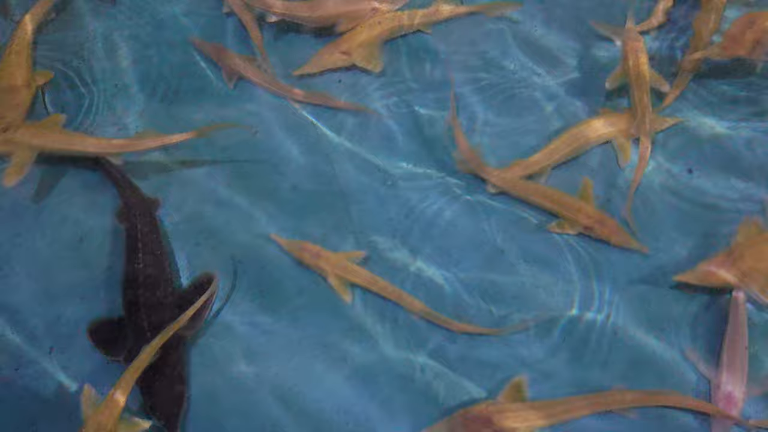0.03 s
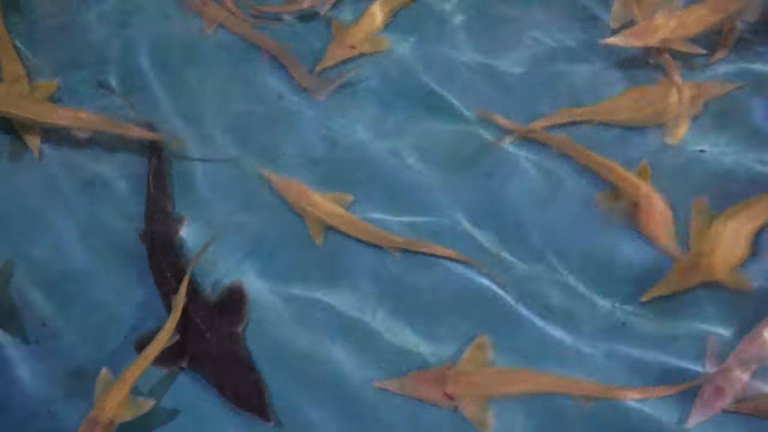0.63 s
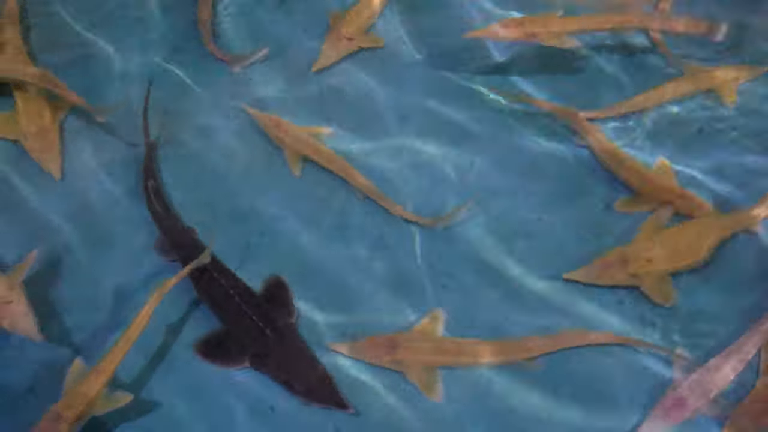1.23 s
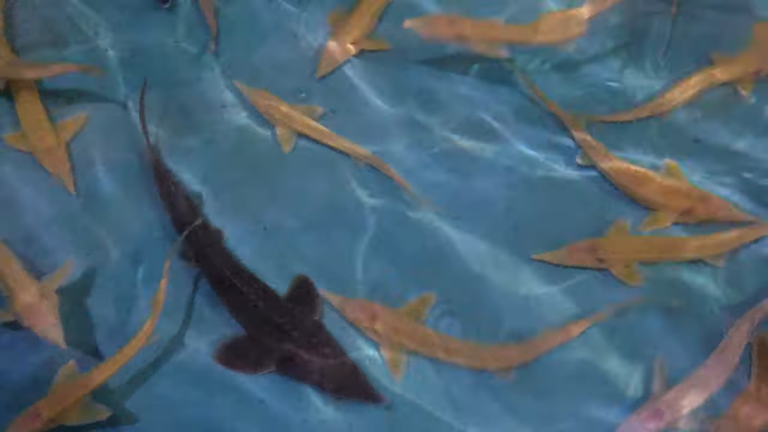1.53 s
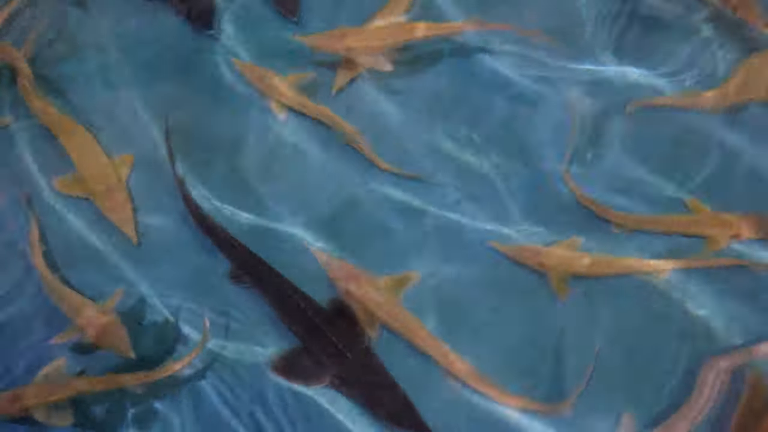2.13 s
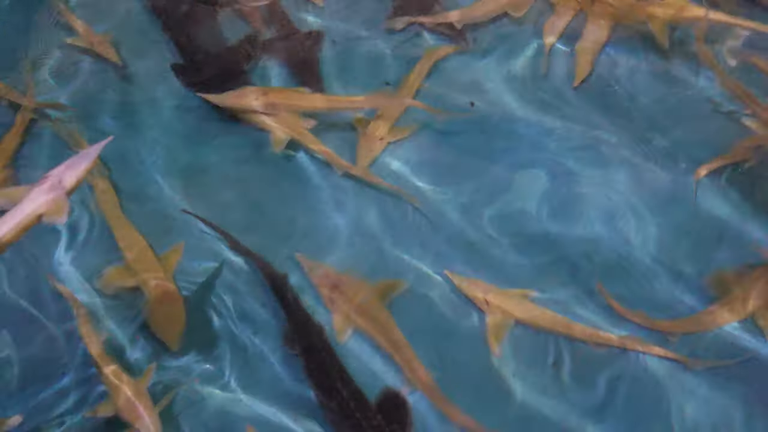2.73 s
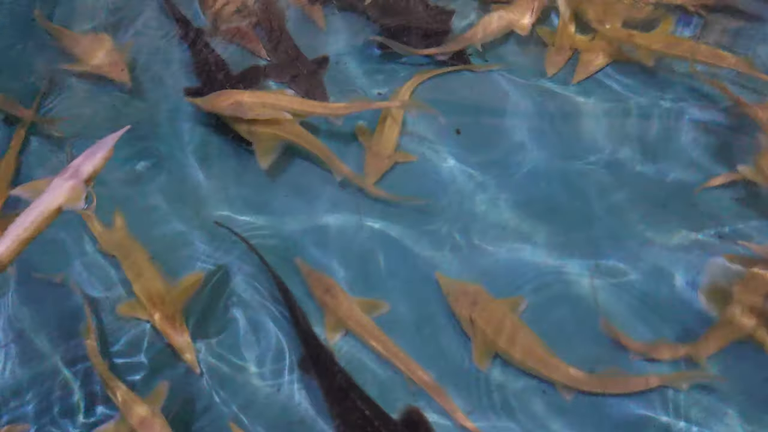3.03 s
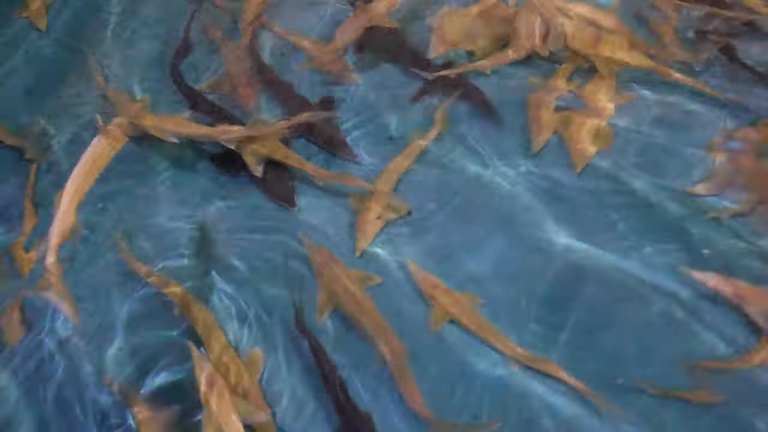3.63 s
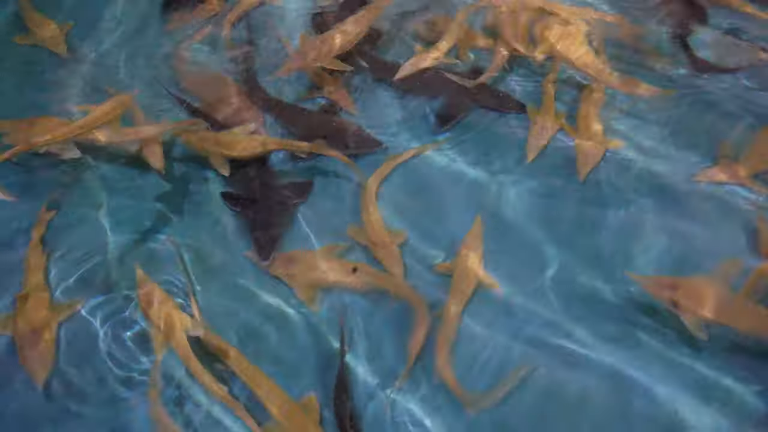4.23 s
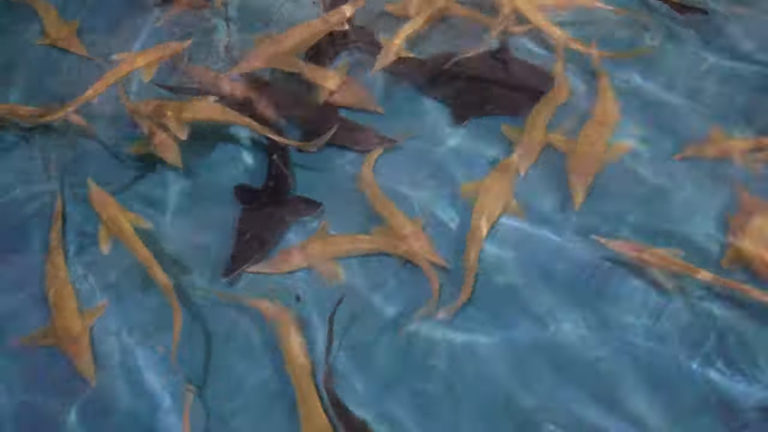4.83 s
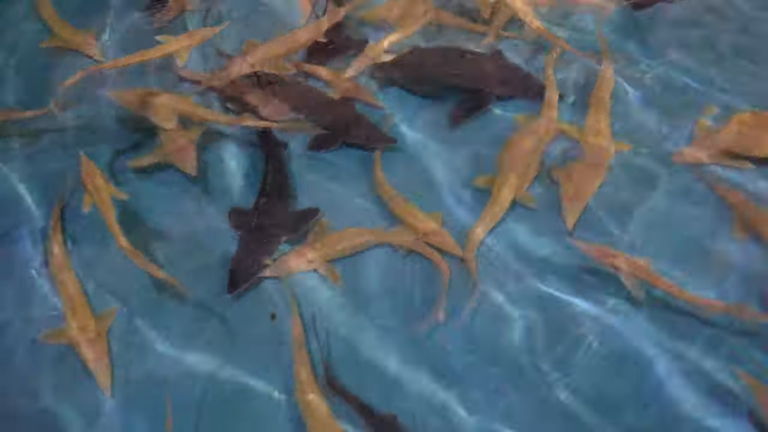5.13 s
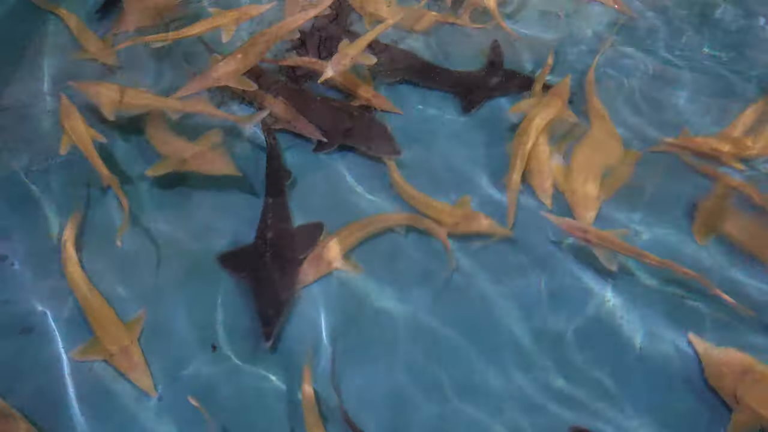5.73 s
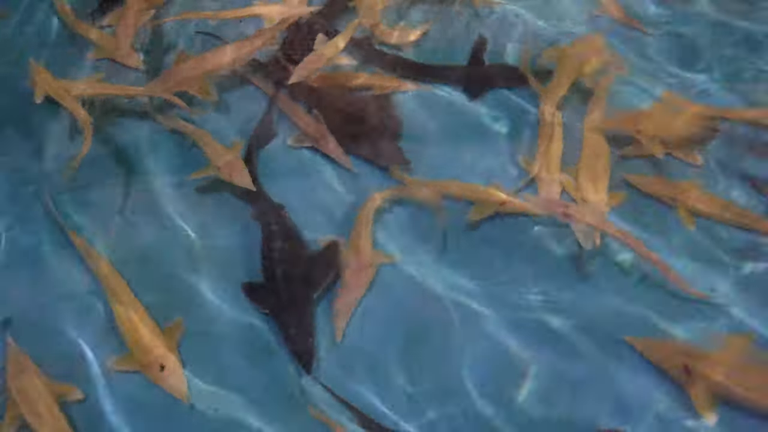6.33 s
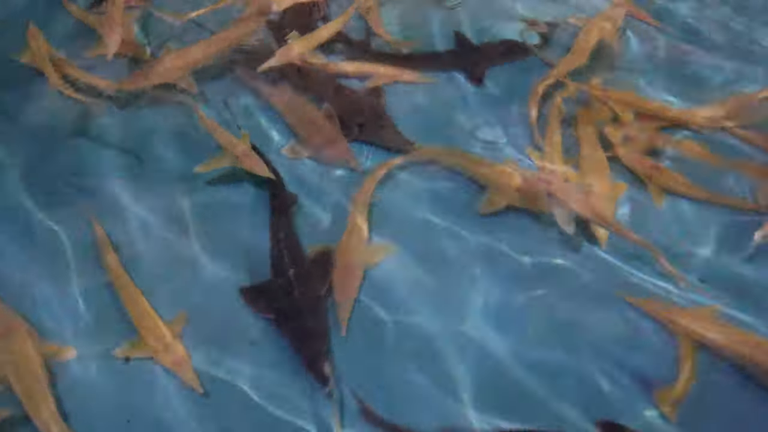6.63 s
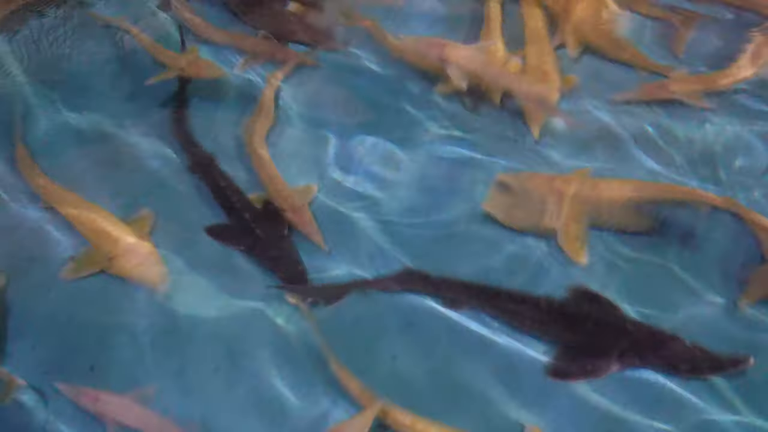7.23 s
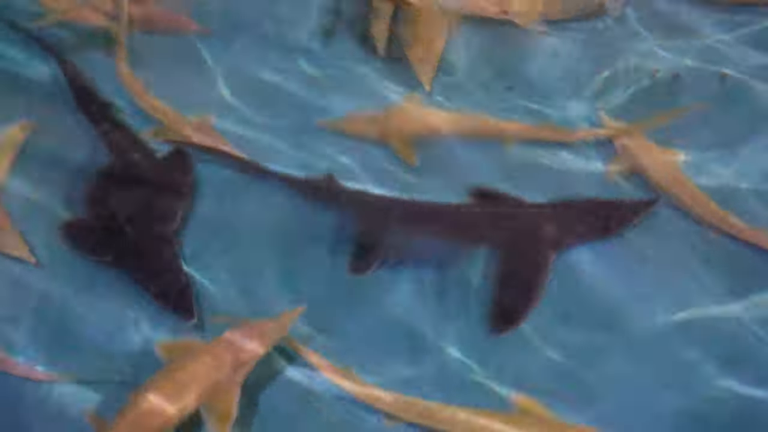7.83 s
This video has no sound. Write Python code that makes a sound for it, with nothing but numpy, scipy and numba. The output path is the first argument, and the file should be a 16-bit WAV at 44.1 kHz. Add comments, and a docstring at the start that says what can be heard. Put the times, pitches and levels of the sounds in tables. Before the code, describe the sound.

Water pours steadily into a fish tank, gurgling and splashing close by, with a low pump hum behind it.

```python
"""Water pours steadily into a fish tank under a roof, close to a hand-held stereo microphone.
The jet wavers and gushes, driving under swarms of ringing bubbles: deep gurgle, bright churn, fine spray.
Air pockets glug, lumps of water plip and torn sheets sizzle on top, a little to the right.
A pump hums behind; the tank resonates and the hall answers. A soft pop opens a fade-in of about a second."""
import sys
import numpy as np
from scipy import signal
from scipy.fft import rfft, irfft, next_fast_len
from scipy.io import wavfile
from scipy.ndimage import uniform_filter1d, map_coordinates
from numba import njit

SR = 44100
rng = np.random.default_rng(int(sys.argv[2]) if len(sys.argv) > 2 else 0)


def wav_record(signal):
    """Record a signal, one row per channel, as 16-bit PCM in the file named by sys.argv[1]."""
    frames = np.transpose(np.atleast_2d(signal))
    bounded = np.clip(frames, -1, 1)
    # unit amplitude maps onto the largest positive 16-bit level
    quanta = np.round(bounded * 32767).astype(np.int16)
    wavfile.write(sys.argv[1], SR, quanta)


N = 351477


def amp(db):
    """Decibels to gain."""
    return 10 ** (np.asarray(db) / 20)


def unit(x):
    """Scaled to rms 1."""
    return x / np.sqrt(np.mean(x ** 2) + 1e-20)


def along(points, hz):
    """(Hz, value) points read on a log axis."""
    f, values = np.transpose(points)
    return np.interp(np.log(hz + 1), np.log(f + 1), values)


def curve(points):
    """(Seconds, value) points read at every sample."""
    return np.interp(np.arange(N) / SR, *np.transpose(points))


def wobble(rate):
    """A smooth random curve, rate knots a second."""
    knots = rng.standard_normal(int(N * rate / SR) + 4)
    return map_coordinates(knots, [np.arange(N) * rate / SR])


def filtered(x, response):
    """x times a complex response of frequency."""
    m = next_fast_len(N + SR // 2)
    return irfft(rfft(x, m) * response(np.fft.rfftfreq(m, 1 / SR)), m)[..., :N]


def resonance(f, hz, width):
    """Response of one mode, 1 at its centre."""
    return 1j * f * width / (hz * hz - f * f + 1j * f * width)


def noise(spectrum, channels):
    """Unrelated noises of rms 1 with the given colour."""
    return unit(filtered(rng.standard_normal((channels, N)), lambda f: amp(along(spectrum, f))))


def bursts(starts, sizes, decay_s):
    """An envelope that jumps at each start and dies away; overlaps add in power."""
    kicks = np.bincount(np.clip(starts * SR, 0, N - 1).astype(int), sizes ** 2, N)
    return np.sqrt(signal.lfilter([1], [1, -np.exp(-2 / (decay_s * SR))], kicks))


def scattered(db, hz, spread_db, octaves, count):
    """Rows (s, dB, Hz) of small events strewn through the pour around a typical level and pitch."""
    when, level, pitch = rng.uniform(-1, 1, (count, 3)).T
    starts = (np.arange(count) + 1 + when) / (count + 1) * N / SR
    return np.column_stack([starts, db + spread_db * level, hz * 2 ** (octaves * pitch)])


@njit
def ring(starts, pitches, sizes, cycles, glide, n, sr):
    """Each bubble swells within a cycle, glides up in pitch and decays by 1/e over its cycles."""
    out = np.zeros(n)
    for i in range(len(starts)):
        first = max(int(starts[i] * sr), 0)
        for k in range(min(int(5 * cycles[i] * sr / pitches[i]), n - first)):
            turns = k * pitches[i] / sr
            age = turns / cycles[i]
            envelope = sizes[i] * (1 - np.exp(-1.5 * turns)) * np.exp(-age)
            out[first + k] += envelope * np.sin(2 * np.pi * turns * (1 + glide * age))
    return out


def bubbles(starts, pitches, sizes, cycles, glide):
    """Ringing bubbles from columns of time, pitch, size and life."""
    lives = cycles * np.ones(len(starts))
    return ring(starts.copy(), pitches.copy(), sizes.copy(), lives, float(glide), N, SR)


def swarm(spectrum, low_hz, high_hz, count, cycles, scatter_db):
    """Countless bubbles of random pitch, a few much louder than the rest; rms 1."""
    when, pitch, chance, life = rng.random((count, 4)).T
    hz = low_hz * (high_hz / low_hz) ** pitch
    size = amp(-scatter_db * np.log(chance + 0.0042) + along(spectrum, hz)) * hz
    return unit(bubbles(when * N / SR, hz, size, cycles * (.5 + life), glide=0.018))


# The roofed hall around the tank. Each row: frequency in Hz, seconds to die away by 60 dB.
HALL_DECAY = [(200, 0.57), (2000, 0.29), (12000, 0.17)]

def hall_tail(early_db, early_s):
    """The tank walls return a quick cluster of echoes, then the roof a weaker stereo tail."""
    hz, t, frames = signal.stft(rng.standard_normal((2, SR // 3)), SR, nperseg=256)
    decay = amp(-60 * t / along(HALL_DECAY, hz)[:, None])
    tail = signal.istft(frames * decay, SR, nperseg=256)[1]
    t = np.arange(tail.shape[1]) / SR
    cluster = 1 + amp(early_db) * np.exp(-(t / early_s - 1) ** 2 * 6)
    tail = tail * (1 - np.exp(-t / 0.0017)) * cluster
    return tail / np.linalg.norm(tail[0])


def placed(x, lag_s, wet_db):
    """A splash right of the microphone reaches the left port late; its echoes shift as it wanders."""
    direct = filtered(x, lambda f: np.exp(-2j * np.pi * f * lag_s * np.array([[.5], [-.5]])))
    spot = 2 * wobble(5)
    echoes = 0
    for share in (np.cos(spot), np.sin(spot)):
        tail = hall_tail(early_db=1.5, early_s=0.013)
        echoes += signal.fftconvolve((x * share)[None], tail, axes=1)[:, :N]
    return (direct + amp(wet_db) * echoes) / np.sqrt(1 + amp(2 * wet_db))


def swells(starts, lifts_db, rise_s=0.02, fall_s=0.03):
    """A level in dB that rises with each gush and ebbs again."""
    t = np.arange(N) / SR
    return sum(db * np.exp(-((t - start) / np.where(t < start, rise_s, fall_s)) ** 2)
               for start, db in zip(starts, lifts_db))


# Strength of the jet. Each row: time in seconds, level in dB over normal flow.
JET_FLOW = [(0.15, -4), (0.6, -1), (1.18, -3), (1.38, 0), (3.3, -0.27), (3.8, 0.5), (5.5, 1), (6.2, 1.04),
            (7.97, 0)]
# Heavy gushes that plunge deep. Each row: peak time in seconds, gurgle lift in dB, churn lift in dB.
GUSHES = [(0.72, 9, 5), (1.17, 14, -1.5), (1.26, 8, 6), (1.35, 13, 5), (1.71, 9, 0.5), (2.09, 10, 4),
          (2.17, -5, 3.5), (3.15, 8, 3.5), (3.42, 3, 4), (3.68, 8.5, 5), (3.885, 13, 5), (4.01, -2, 2.5),
          (4.335, 3, 1), (4.75, 0, 2.5), (5.25, 12.5, 0), (5.35, -1, 2.5), (5.79, 8, 5.5), (5.999, 15, -2),
          (6.16, 7, 2), (6.24, 7, -2), (6.33, 1, 2), (6.43, 1, 1), (6.89, 7, -1), (7.09, 10.5, 0.5),
          (7.25, 10.5, 3.5), (7.93, 8, 4.5)]

def jet():
    """Gurgle, churn and spray in dB over normal flow: all follow the wavering jet and its gushes."""
    flow_db = curve(JET_FLOW) + 0.29 * wobble(16)
    times, deep_db, bright_db = np.transpose(GUSHES)
    gush_db = swells(times, bright_db)
    # a stronger jet drives air deeper, so the gurgle grows fastest
    gurgle_db = 2.7 * flow_db + 1.44 * wobble(16) + swells(times, deep_db)
    return gurgle_db, flow_db + gush_db, flow_db + 0.32 * gush_db


def slugs(count, scatter_db, decay_s):
    """The jet breaks into uneven slugs, each landing at once and tailing off; an envelope of rms 1."""
    when, chance = rng.random((count, 2)).T
    sizes = amp(-scatter_db * np.log(chance + 0.035))
    return unit(bursts(when * N / SR, sizes, decay_s))


# Deep, bright and fine bubbles at close range. Each row: frequency in Hz, relative density in dB.
GURGLE_SPECTRUM = [(60, -22), (130, -13), (240, -3.5), (350, -2.5), (500, -3), (800, -2), (1100, 0),
                   (1600, -12), (3000, -50)]
CHURN_SPECTRUM = [(500, -37), (1000, -7.5), (1400, -7.5), (2100, 2), (2600, -3), (3200, -4.5), (4200, -12),
                  (8000, -36)]
SPRAY_SPECTRUM = [(1500, -19), (3000, -1), (3700, 1), (5000, 0), (6400, 1), (7500, -8), (9500, -9),
                  (12000, -5.5), (15800, -8.5)]

def stream():
    """The jet drives three swarms of bubbles under; each rides on a wash of its own colour."""
    gurgle_db, churn_db, spray_db = jet()
    landing = slugs(count=1700, scatter_db=3, decay_s=0.01)
    deep = swarm(GURGLE_SPECTRUM, 131, 1603, count=3400, cycles=2.26, scatter_db=3)
    bright = swarm(CHURN_SPECTRUM, 887, 4455, count=11000, cycles=2.3, scatter_db=2.5)
    fine = swarm(SPRAY_SPECTRUM, 2807, 15770, count=36000, cycles=4.5, scatter_db=3.5)
    gurgle = placed(deep, lag_s=0.0015, wet_db=-3.5)
    gurgle += amp(-8) * noise(GURGLE_SPECTRUM, channels=2)
    churn = placed(unit(bright * landing), lag_s=0.001383, wet_db=0.5)
    churn += amp(-4.5) * noise(CHURN_SPECTRUM, channels=2)
    spray = placed(unit(fine * landing), lag_s=0.000392, wet_db=0)
    spray += amp(2.5) * noise(SPRAY_SPECTRUM, channels=2) * (0.8 + 0.3 * landing)
    # the largest bubbles follow only part of the gurgle's swings
    large = filtered(gurgle, lambda f: along([(280, 0.85), (480, 0.19)], f))
    depths = amp(gurgle_db) * (gurgle - large) + amp(0.62 * gurgle_db) * large
    return amp(-44.5) * depths + amp(churn_db - 32) * churn + amp(spray_db - 31.5) * spray


# The pump, heard from behind the pour. Each row: time in seconds, level in dB.
PUMP_LEVEL = [(0.15, -79), (0.45, -61), (1.06, -50.5), (1.7, -48), (7.97, -45)]
# Its motor tones. Each row: frequency in Hz, relative level in dB.
MOTOR_TONES = [(50, -4.5), (99.8, -9)]
# Its rumble. Each row: frequency in Hz, relative density in dB.
RUMBLE_SPECTRUM = [(15, -34), (30, -4), (45, 1), (70, -4), (110, -5.5), (150, -12), (220, -10), (400, -35)]

def pump():
    """Motor hum that wavers slightly, over a rumble mostly alike in both microphone ports."""
    t = np.arange(N) / SR
    hum = 0
    for hz, db in MOTOR_TONES:
        peak = amp(db + 1.1 * wobble(3.7)) * np.sqrt(2)
        hum += peak * np.sin(2 * np.pi * hz * t + .15 * wobble(3.24))
    centred = amp(-3) * noise(RUMBLE_SPECTRUM, channels=1)
    wide = amp(-11) * noise(RUMBLE_SPECTRUM, channels=2)
    return amp(curve(PUMP_LEVEL)) * (hum + centred + wide)


# The biggest air pockets under the jet. Each row: start in seconds, level in dB, pitch in Hz.
AIR_POCKETS = [(0.256, -20, 713), (0.383, -22, 910), (0.48, -23, 694), (0.732, -19.5, 586),
               (1.183, -19.5, 614), (1.264, -19.5, 764), (1.501, -16.5, 1060), (1.601, -18, 570),
               (2.191, -23.5, 506), (2.527, -20, 563), (2.597, -23, 573), (2.67, -21.5, 770),
               (2.924, -22, 918), (3.999, -20, 910), (4.112, -15.5, 785), (4.175, -18, 800),
               (4.67, -19.5, 790), (4.728, -17, 470), (4.953, -20, 540), (5.238, -16, 670),
               (5.771, -18, 545), (6.435, -19.5, 786), (7.005, -21, 800), (7.074, -13, 750),
               (7.636, -13.5, 960), (7.788, -21, 550), (7.815, -11.5, 1000)]
# Big slow bubbles, dead centre. Each row: start in seconds, level in dB, pitch in Hz.
BIG_BUBBLES = [(1.382, -37, 235), (2.815, -36, 300), (3.609, -35, 310), (3.789, -37.5, 231),
               (3.97, -36, 243), (4.05, -40, 196), (5.659, -28, 233), (5.714, -24, 220), (5.916, -35, 317),
               (6.193, -40, 255), (6.329, -32.5, 250)]

def glugs():
    """Air pockets collapse with a blunt slap and a hollow note; the biggest bubbles ring low and longer."""
    small = scattered(db=-29.5, hz=710, spread_db=4.5, octaves=0.67, count=22)
    starts, db, hz = np.transpose([*AIR_POCKETS, *small])
    note = bubbles(starts, hz, amp(db), cycles=1.9, glide=.01)
    slap = bubbles(starts, 1.3 * hz, amp(db), cycles=0.84, glide=0)
    starts, db, hz = np.transpose(BIG_BUBBLES)
    big = bubbles(starts, hz, amp(db), cycles=4.9, glide=0.014)
    return placed(note + slap, lag_s=0.0014, wet_db=-6) + big


def droplets(starts, db, hz):
    """Each splash throws six droplets that ring small bubbles; later ones tend to be fainter."""
    delay, pitch, size = rng.standard_normal((len(starts), 3, 6)).transpose(1, 0, 2)
    flight_s = .007 + .018 * abs(delay)
    lands = starts[:, None] + flight_s
    drop_hz = np.clip(1.12 * hz[:, None] * np.exp(.4 * pitch), 500, 12000)
    drop_db = db[:, None] - 15 + 2 * size - 130 * flight_s
    return bubbles(lands.ravel(), drop_hz.ravel(), amp(drop_db).ravel(), cycles=1.6, glide=0.046)


# The biggest lumps of water, landing close to the microphone.
# Each row: start in seconds, level in dB, bubble pitch in Hz, spray level in dB.
WATER_LUMPS = [(0.3046, -3, 3550, -31), (0.3789, -4.5, 4700, -24), (0.411, -11, 2050, -30),
               (0.6513, -9, 6370, -18), (0.8154, -6, 2260, -22), (0.831, -7.5, 2150, -23),
               (0.9726, -8.5, 1940, -26), (1.2595, -7, 2180, -19), (1.3392, -15, 1270, -29),
               (1.3712, -13, 4700, -12.5), (1.5902, -2.5, 1950, -27), (1.6, -10, 1980, -27),
               (1.6331, -9.5, 2110, -26), (1.7653, -10, 4740, -22), (2.102, -7.5, 3500, -18),
               (2.1903, -6, 2020, -27), (2.3325, -9.5, 1940, -12), (2.4487, -7.5, 2560, -15),
               (2.6508, -8, 3320, -12.5), (2.9236, -10, 1970, -13.5), (2.927, -15.5, 1410, -28),
               (2.9805, -3, 2420, -32), (2.998, -13, 2420, -32), (3.0818, -10, 2200, -38),
               (3.1596, -14.5, 1410, -15), (3.1826, -4, 4200, -18), (3.5033, -2, 2240, -37),
               (3.521, -7, 2310, -14.5), (3.7612, -9.5, 1830, -11), (3.8016, -15, 2370, -13),
               (3.8765, -14, 1380, -15), (4.1134, -7.5, 2070, -29), (4.1763, -7.5, 1870, -27),
               (4.2416, -10, 5900, -15), (4.3205, -7, 2970, -18), (4.6153, -15.5, 1460, -15),
               (4.7275, -8, 2800, -27), (5.0139, -8, 3080, -12), (5.2905, -6.5, 1940, -21),
               (5.3475, -5.5, 2000, -21), (5.349, -11, 1340, -28), (5.8026, -11, 1420, -17),
               (5.8979, -7.5, 3580, -21), (6.0665, -8, 2130, -25), (6.2022, -5, 5050, -17),
               (6.4247, -10.5, 2000, -22), (6.5599, -4.5, 2780, -22), (6.8028, -14, 2270, -30),
               (6.8961, -10, 1980, -30), (6.9285, -11.5, 1980, -32), (7.0052, -11, 1920, -15),
               (7.093, -9.5, 2870, -15.5), (7.372, -9.5, 1710, -15.5), (7.5716, -12.5, 1590, -30),
               (7.6743, -8.5, 1600, -34), (7.8674, -10, 1620, -23)]

def plips(small_spray_db=-18.5):
    """A lump of water cracks on the surface, rings one bubble, and throws droplets and a puff of spray."""
    small = scattered(db=-17, hz=1950, spread_db=7, octaves=0.82, count=36)
    starts, db, hz, spray_db = np.transpose([*WATER_LUMPS, *[(*row, small_spray_db) for row in small]])
    note = bubbles(starts, hz, amp(db + 2), cycles=2.78, glide=0.0098)
    impact_db = db + .5 * np.minimum(db + 6.5, 0)  # small lumps land softly
    slap = bubbles(starts, 1.19 * hz, amp(impact_db + 2.5), cycles=1, glide=0)
    crack_spectrum = [(400, -32), (900, -8.5), (2000, -11), (3400, 3),
                      (5500, -18), (8000, -30), (15800, -23)]
    crack = bursts(starts, amp(impact_db - 10), decay_s=0.0023) * noise(crack_spectrum, channels=1)[0]
    splash = note + slap + crack + droplets(starts, db, hz)
    cloud = bursts(starts + 0.0027, amp(spray_db - 5), decay_s=0.012)
    cloud = uniform_filter1d(cloud, size=350)  # spray takes a moment to rise and land
    puffs = cloud * swarm(SPRAY_SPECTRUM, 2780, 16000, count=18000, cycles=2.5, scatter_db=2.4)
    return placed(splash, lag_s=0.0014, wet_db=-2) + placed(puffs, lag_s=0.000351, wet_db=-5)


# Thin sheets of water tearing, just right of centre. Each row: start in seconds, level in dB.
TORN_SHEETS = [(0.8154, -13), (0.984, -10), (1.3713, -18), (1.7649, -6), (2.8654, -11), (3.1822, -14),
               (4.7844, -7), (5.311, -18), (5.57, -17), (6.56, -10)]
# Their sizzle. Each row: frequency in Hz, relative density in dB.
SIZZLE_SPECTRUM = [(1500, -30), (3000, 2), (3800, 8), (5200, -1), (6400, 6), (8000, -31), (15800, -18)]

def squirts():
    """A torn sheet of water falls as a short shower of small bubbles."""
    starts, db = np.transpose(TORN_SHEETS)
    shower = swarm(SIZZLE_SPECTRUM, 1810, 11900, count=16000, cycles=1.6, scatter_db=3.2)
    return placed(bursts(starts, amp(db - 11), decay_s=0.029) * shower, lag_s=0.0004, wet_db=-5.5)


# Resonances of the tank and the air above it. Each row: frequency in Hz, width in Hz, gain in dB.
TANK_MODES = [(256, 14, -8.5), (470, 6.8, -20), (558, 36, -9), (730, 15, -1.5), (795, 12.3, 7),
              (902, 12, 2), (1335, 110, -13), (1480, 15, -19), (1890, 62, -1.5), (2270, 37, -9)]

def tank(f):
    """Response of the tank: its modes add to the direct sound."""
    return 1 + sum(amp(db) * resonance(f, hz, width) for hz, width, db in TANK_MODES)


def scene():
    """The water rings through the tank, its long waves reaching both ports alike; the pump hums behind."""
    water = amp(-0.5) * filtered(stream() + plips() + squirts() + glugs(), tank)
    side = water - water.mean(axis=0)
    bass_side = filtered(side, lambda f: along([(200, 1.0), (380, 0.005)], f))
    return water - bass_side + pump()


# Balance of the microphone's two ports. Each row: frequency in Hz, left minus right in dB.
PORT_BALANCE = [(50, -4), (130, 2), (280, 4), (370, 1), (470, -9.5), (700, -6), (1100, 6), (1450, -11),
                (1750, -1.5), (2200, -2.5), (4500, 0.5), (5900, -6), (7300, -3), (15000, 2)]
# Bands that each port cancels. Each row: centre in Hz, width in Hz.
LEFT_PORT_NOTCHES = [(6450, 870), (8600, 960)]
RIGHT_PORT_NOTCHES = [(8200, 1290)]

def microphone(f, top_hz=15900):
    """Stereo response: each port has its own colour and notches, under a steep band limit."""
    def notched(notches):
        return np.prod([1 - resonance(f, hz, width) for hz, width in notches], axis=0)

    tilt_db = along(PORT_BALANCE, f) / 2
    left = amp(tilt_db) * notched(LEFT_PORT_NOTCHES)
    right = amp(-tilt_db) * notched(RIGHT_PORT_NOTCHES)
    band_limit = amp(-6 * np.logaddexp(0, (f - top_hz) / 50))
    return np.array([left, right]) * band_limit


def record(dry):
    """At the microphone beside the tank, the sound opens with a soft pop and fades in."""
    start_s, fade_s = 0.136, 0.43
    since = np.maximum(np.arange(N) / SR - start_s, 0)
    pop = amp(-31.5) * (1 - np.exp(-since / 0.0001)) * np.exp(-since / 0.00068)
    fade_in = 1 - np.exp(-(since / fade_s) ** 1.18)
    return filtered(dry * fade_in - pop, microphone)


dry = scene()
out = record(dry)
wav_record(out)
```